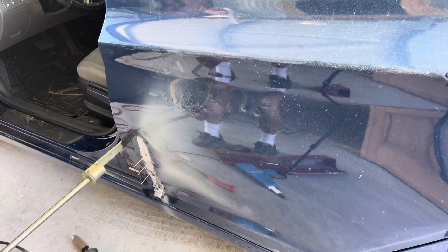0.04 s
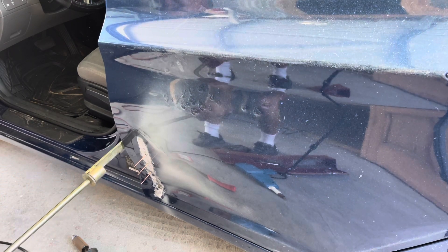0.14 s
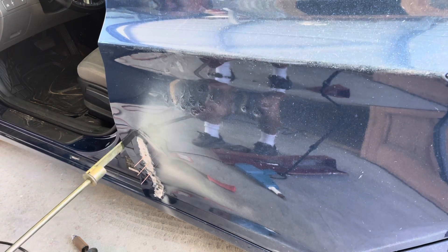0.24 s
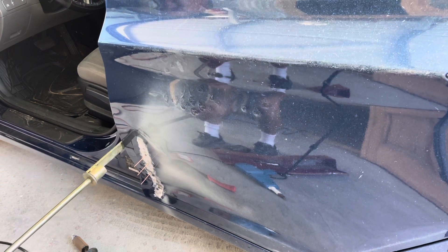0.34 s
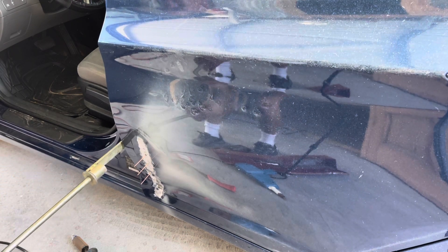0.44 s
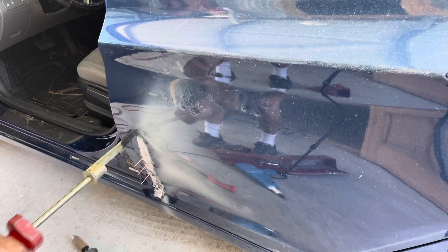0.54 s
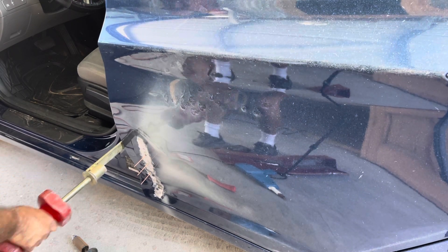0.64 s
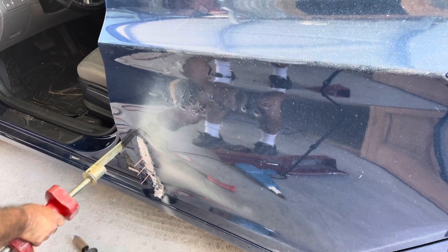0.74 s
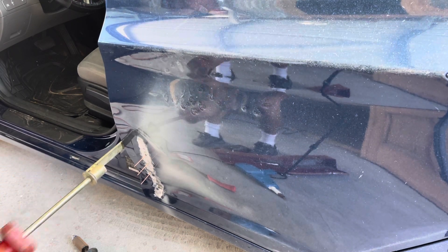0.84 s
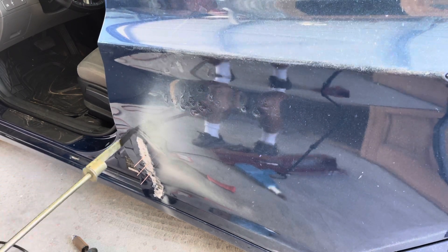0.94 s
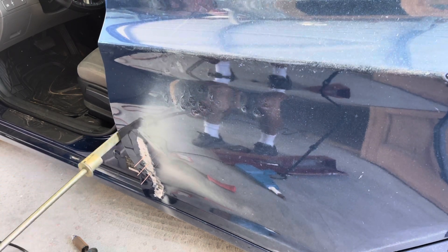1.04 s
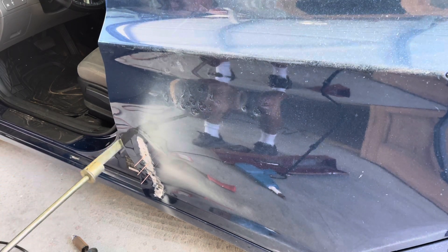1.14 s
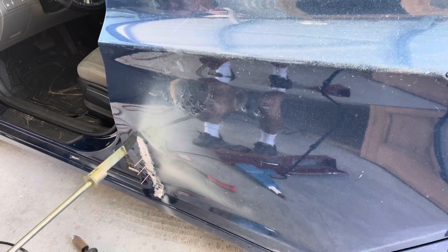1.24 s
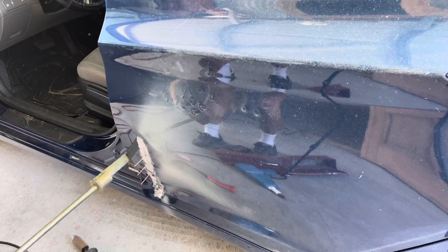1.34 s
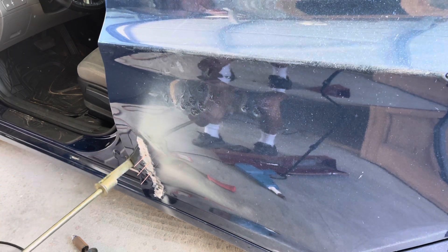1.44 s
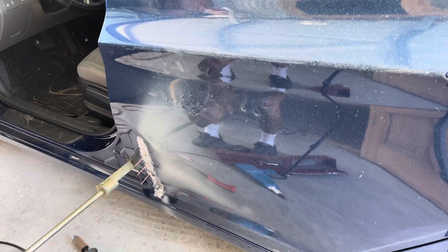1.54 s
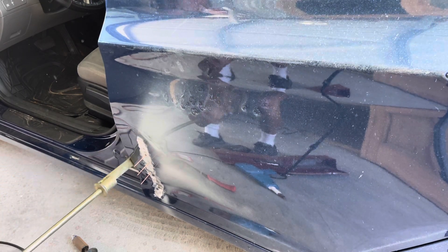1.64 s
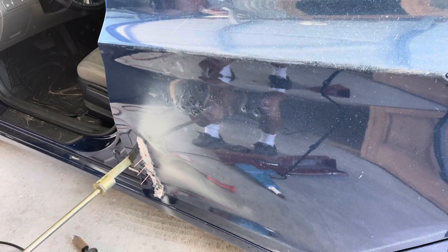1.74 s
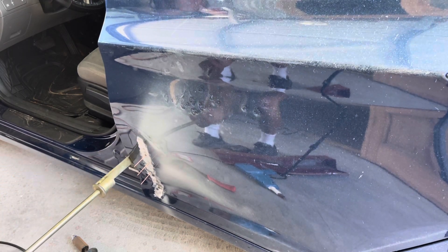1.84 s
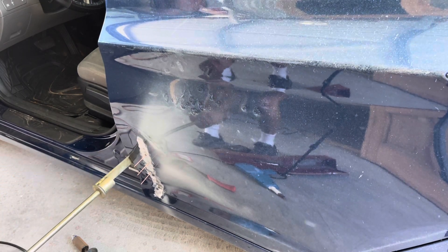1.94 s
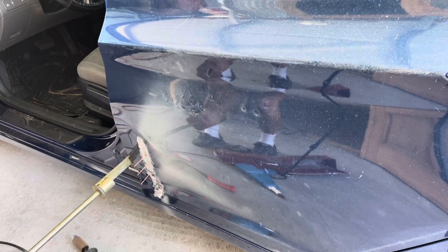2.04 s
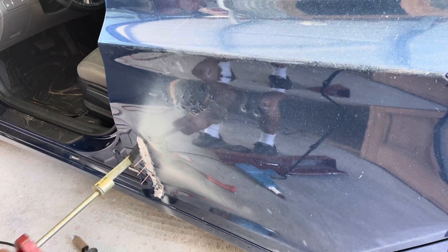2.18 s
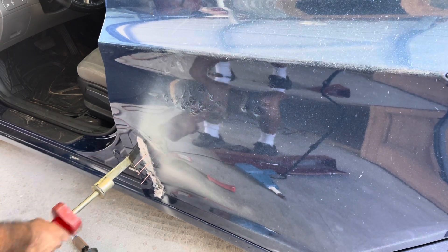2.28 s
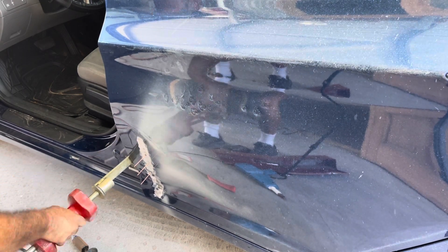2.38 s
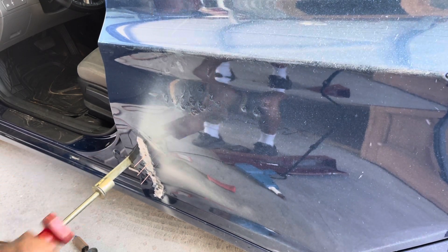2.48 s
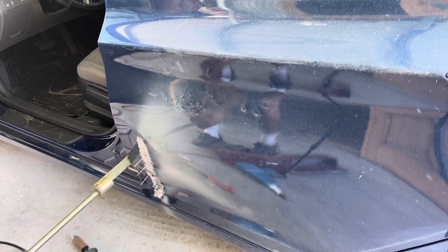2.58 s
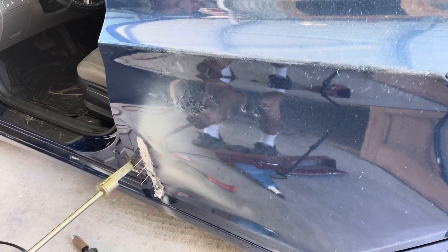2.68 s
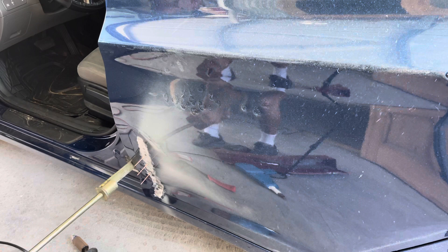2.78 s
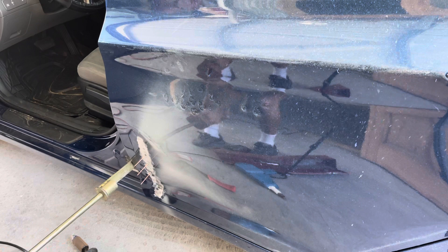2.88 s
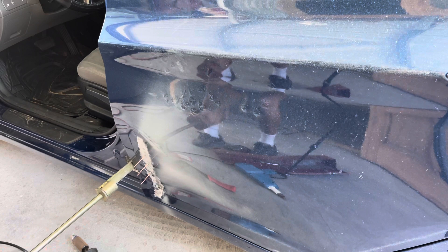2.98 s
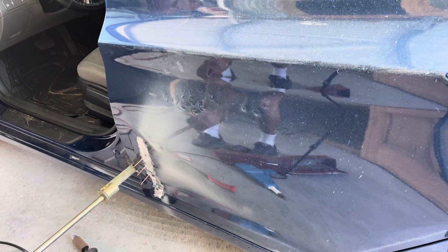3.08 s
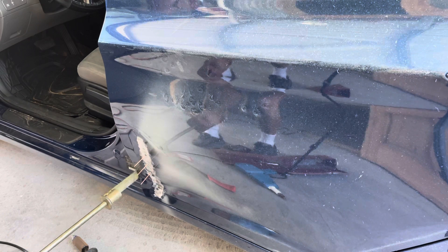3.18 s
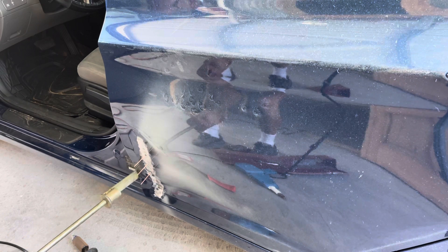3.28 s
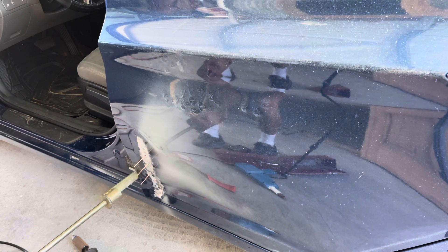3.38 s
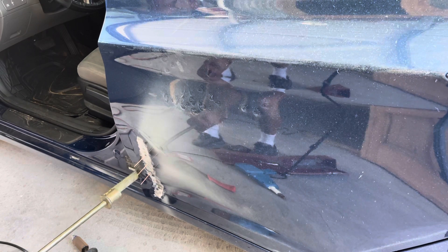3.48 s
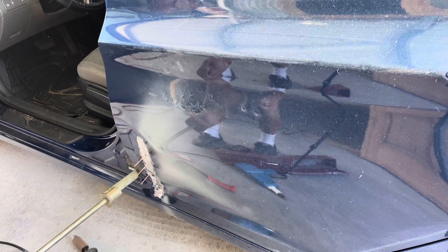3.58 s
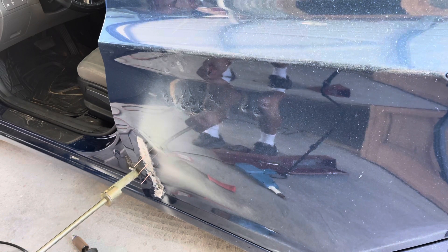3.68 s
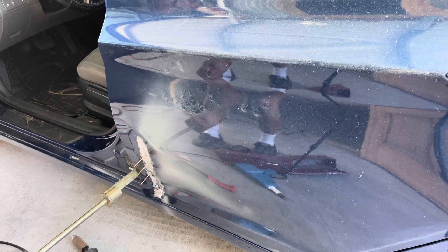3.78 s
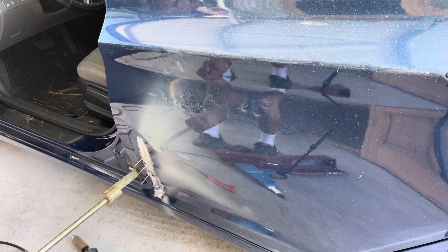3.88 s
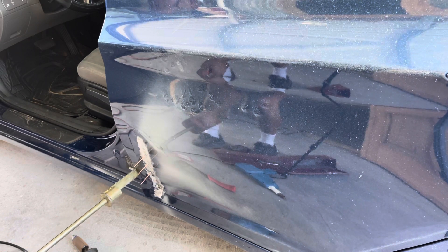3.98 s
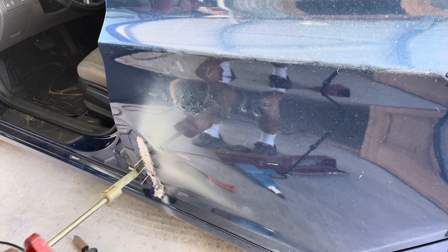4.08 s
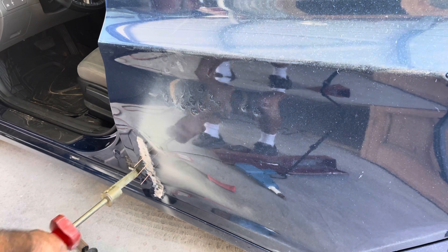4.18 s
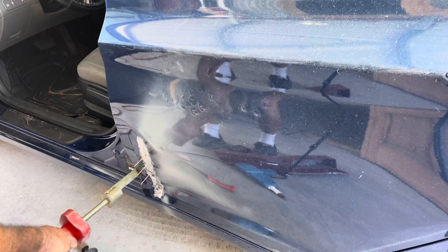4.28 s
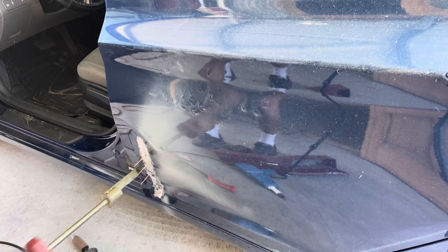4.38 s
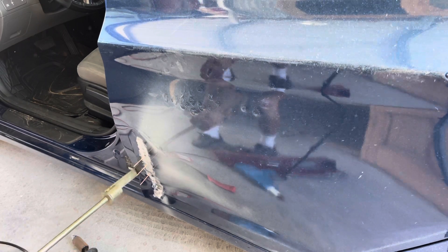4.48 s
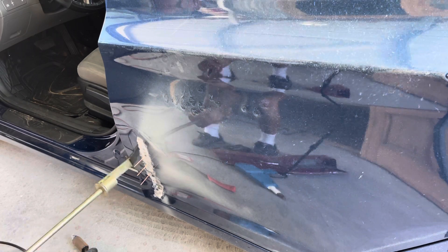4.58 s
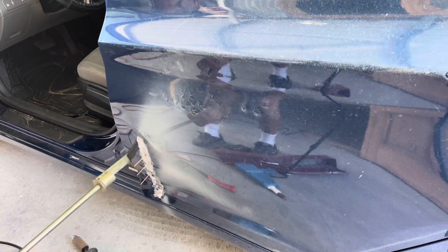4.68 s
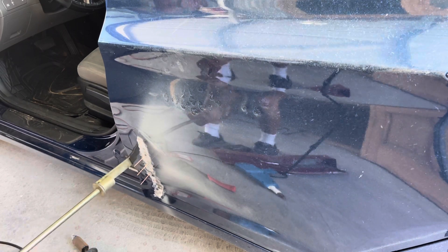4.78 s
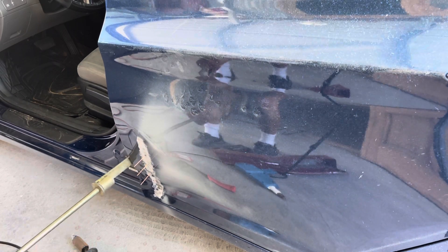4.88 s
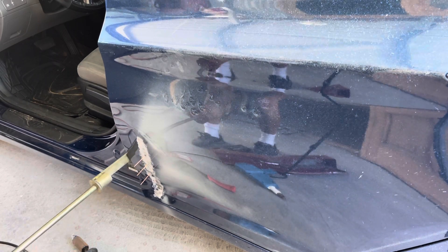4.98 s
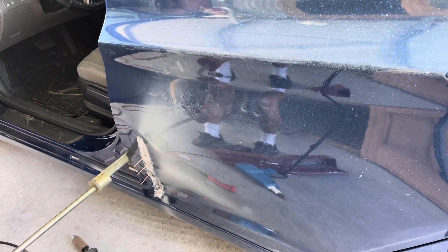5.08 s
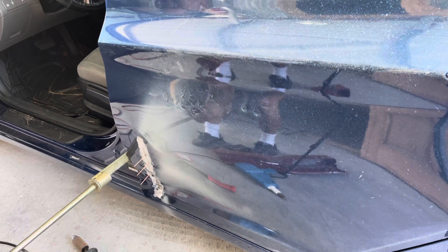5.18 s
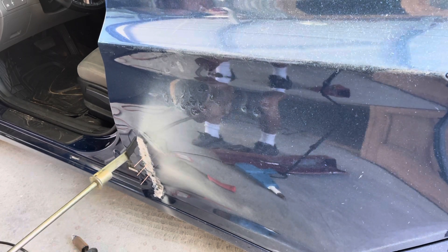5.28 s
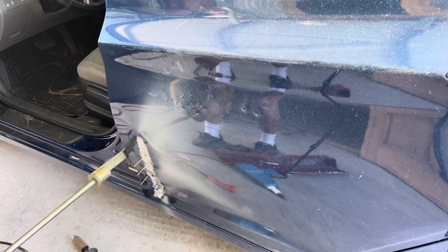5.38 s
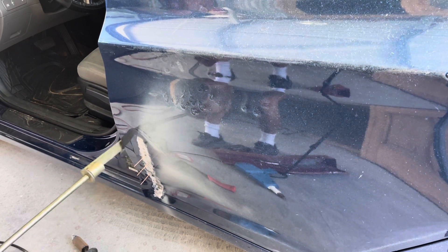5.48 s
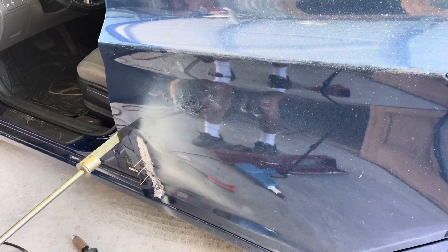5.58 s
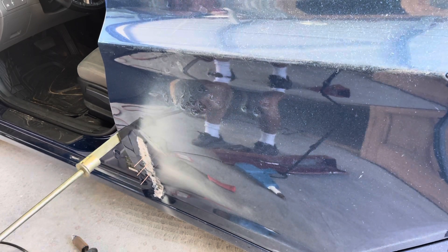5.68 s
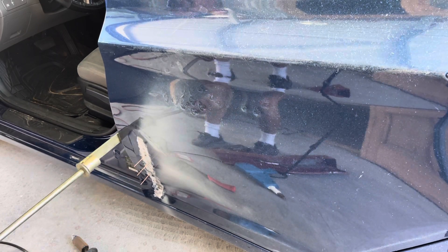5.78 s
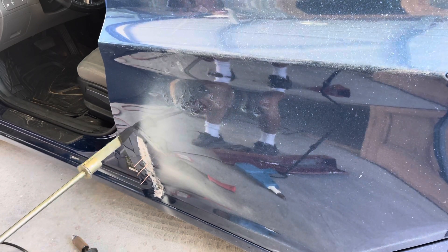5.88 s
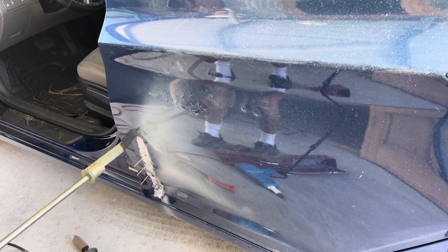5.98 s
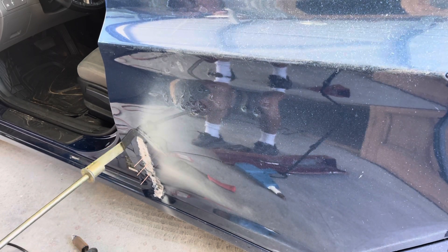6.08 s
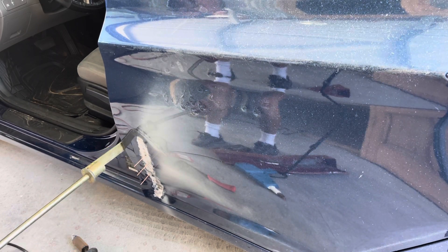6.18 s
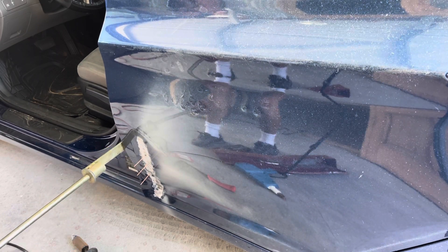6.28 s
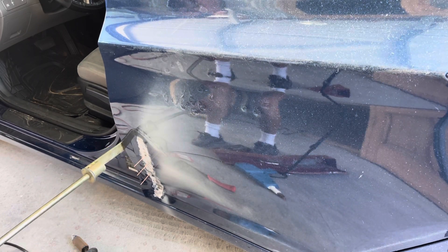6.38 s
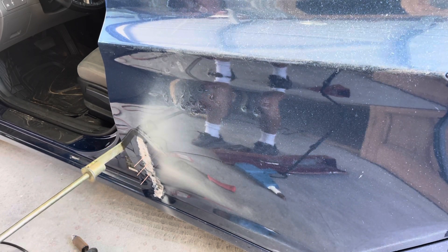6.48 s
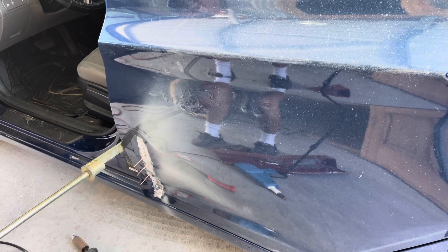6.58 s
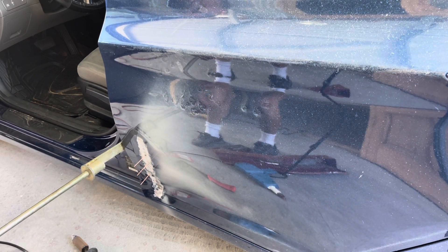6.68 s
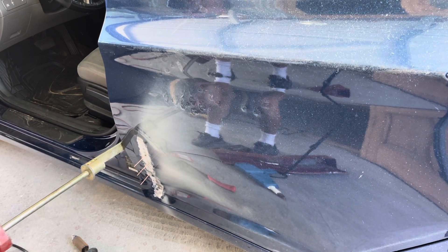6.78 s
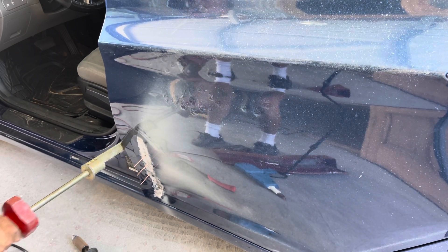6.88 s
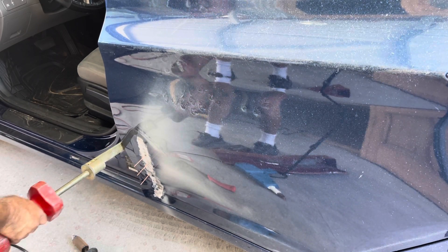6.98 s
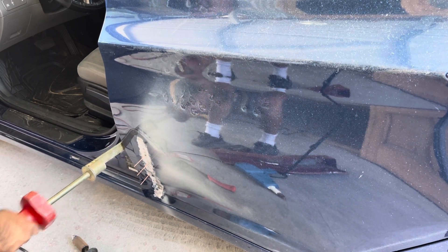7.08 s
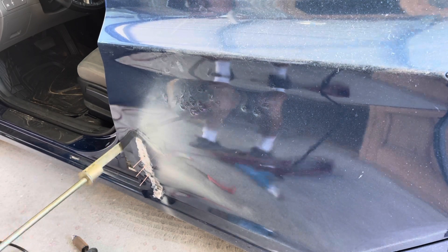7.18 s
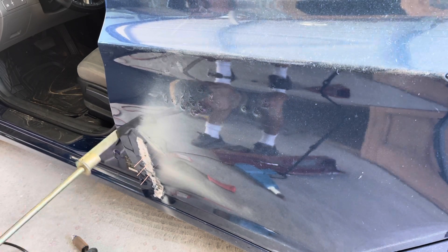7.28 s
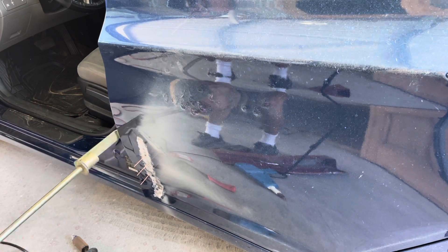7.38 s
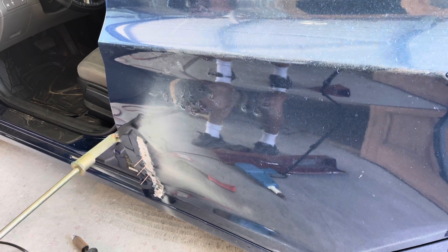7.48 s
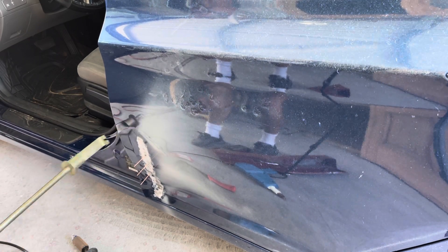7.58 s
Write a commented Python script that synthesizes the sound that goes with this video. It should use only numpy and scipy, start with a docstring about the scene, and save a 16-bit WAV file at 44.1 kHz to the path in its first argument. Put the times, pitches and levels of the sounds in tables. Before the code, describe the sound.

A close stereo view of dent pulling on a car door in a quiet workshop, about 7.6 seconds. At 0.05 a noticeable clunk and tiny knocks, with faint grinding of the hook; from 0.43 a soft rub of the weight along the rod, then a short rising hiss into a huge slam at 0.9: bright steel crack, crashing sheet metal, slow low door boom, loose rattle. Faint scuffs follow around 1.4, a clunk at 1.8, a slide from 2.06 and the second slam at 2.56. A quieter gap holds tiny taps and scraping until another slide at 4.0 and the third, higher-toned slam at 4.43. Several dull and hard knocks cluster from 4.65 to 6.05. After near quiet, a slide at 6.7 leads to the fourth, loudest slam at 7.18, dying into a short room tail and faint scrape over low air noise.

```python
"""A hook grinds and knocks in its hold on a car door, then a weight hisses up a steel rod and slams back on its stop.
Four such blows pull at a dent: shaped noise and ringing modes make the crack of steel, the crash of
sheet metal and the slow boom of the door. Between blows come knocks, soft scuffs and scraping.
Friction noise and drifting resonances follow the speed of the weight along the rod.
A body shop answers with a diffuse tail over low air noise and a faint whine; a fast limiter holds the peaks."""
import sys
import numpy as np
from scipy import signal
from scipy.fft import rfft, irfft, next_fast_len
from scipy.io import wavfile
from scipy.ndimage import uniform_filter1d, minimum_filter1d, map_coordinates

SR = 44100
rng = np.random.default_rng(int(sys.argv[2]) if len(sys.argv) > 2 else 0)


def to_wav(sig):
    """Store sig (one row per channel, or 1-D mono) as 16-bit WAV at the path in sys.argv[1].

    Samples outside -1..1 are clipped; the rate is SR.
    """
    pcm = np.clip(np.atleast_2d(sig), -1, 1) * 32767
    pcm = np.round(pcm).astype(np.int16)
    wavfile.write(sys.argv[1], SR, pcm.T)  # frames by channels


N = 336924  # samples

# The weight meets its stop; the three layer trims are relative to level_db:
# start_s, level_db, steel_db, sheet_db, boom_db, brightness_db_per_octave, panel_hz
BLOWS = [(0.897, -9, 0.5, 0, -0.5, 0.1, 290), (2.5643, -9, 0.5, -1.5, 0, 0.5, 300.5),
         (4.435, -8.5, -1, -1, 0.5, 1.0, 480), (7.18, -8, 2, -1, 1, -0.4, 690)]
# Hook and weight knock against door and rod; tick and rod trims are relative to level_db:
# start_s, level_db, brightness_db_per_octave, tick_db, rod_db
KNOCKS = [(0.05, -23.5, -0.1, -17.5, -32), (0.091, -36.5, -1.5, -3.5, -18.5), (0.111, -30, 1, -10.5, -16),
          (0.698, -37.5, 1.3, -5.5, -11.5), (1.106, -43, -1.5, 3, -17), (1.181, -49.5, -1.5, 2.5, -6),
          (1.254, -44.5, 0.5, -26, -14.5), (1.297, -45, -0.3, -5.5, -8), (1.803, -27.5, 0.5, -8, -10),
          (1.911, -38, 1.6, -9.5, -17), (2.027, -45, 0.3, -32, -36), (2.992, -47, -0.5, 1.5, -4.5),
          (3.605, -50.5, -1.5, -26, -25.5), (3.749, -53, 0.2, -28, -20), (3.799, -51, -0.5, -16, -19),
          (4.306, -49, -2.2, -20.5, -24), (4.657, -29.5, 1.1, -25, -35.5), (4.819, -35, -1.5, -16, -8),
          (4.879, -37.5, -1.5, -34.5, -30), (5.036, -30.5, -1.4, -10, -16), (5.189, -29, 3, -12.5, -26),
          (5.441, -33.5, 0.5, -20, -33), (5.563, -27.5, -0.05, -23, -45), (5.715, -46.5, -3.6, -10.5, -23),
          (5.856, -51, -1.2, -8.5, -12), (5.963, -37, -3.6, -23.5, -33), (6.049, -57, -0.1, -13, -17),
          (7.554, -50.5, 1, 0.5, -8.5)]
# The hook drags softly over the sheet metal: start_s, level_db, rise_s
SCUFFS = [(0.358, -51, .006), (1.384, -44.5, 0.004), (1.432, -43, 0.023), (1.472, -46, 0.01),
          (1.598, -51.5, .006), (1.699, -50.5, .008), (3.059, -48.5, 0.0088), (3.432, -53.5, .005),
          (4.983, -38, .006), (5.405, -43, 0.0043), (5.930, -36, 0.01), (6.754, -45, 0.0027)]
# The weight is pushed up the rod from rest to rest, then pulled back:
# push_start_s, push_end_s, push_top_speed (1 = speed of a blow), pull_length_s
STROKES = [(0.432, 0.782, 0.42, 0.15), (2.06, 2.445, 0.53, 0.16), (3.981, 4.285, 0.36, 0.14),
           (6.71, 7.04, 0.42, 0.12)]
# The hook grinds in its hold: start_s, end_s, starting_level_db, rod_singing_db (relative to the grind)
GRINDS = [(0, .5, -60.5, -23), (1.102, 2.4, -60.5, -32), (2.802, 4.3, -62.5, -32), (4.601, 6.1, -55, -21),
          (6.594, 7.1, -66, -31), (7.398, 7.64, -60, -7)]

# Modes of the door skin, ringing freely: pitch_hz, level_db, t60_s
SKIN_MODES = [(213.7, -8, 0.24), (264.7, -2, 0.15), (281.3, 2, 0.25), (309, 4, 0.16), (343.9, -7.5, 0.067),
              (383.6, -7.5, 0.087), (443, -4, 0.42), (558, -5, .28), (645.5, -2.5, 0.2), (701, 0, 0.26),
              (781, -1, 0.15), (838, -1, 0.09), (934, -3.5, .18), (1012, -3.5, .24), (1070, -8.5, .16),
              (1188, -1.5, .16), (1200, 0, 0.19), (1306, -4.5, .18), (1340, -1, 0.25), (1464, -4.5, 0.087),
              (1630, -8, .16), (1767, -7, .16), (2000, -12.5, 0.12), (2442, -10.5, 0.52)]
# The whole door swings on its hinges: pitch_hz, level_db, t60_s, rise_s
DOOR_MODES = [(48, 9.5, 0.4, .05), (59.7, -2, .55, 0.02), (81, -1.5, 0.45, 0.0058),
              (97.3, -5.5, 0.25, 0.0067), (150.8, 3, .46, 0.0034), (172.4, -3.5, .33, 0.0045)]
# Bending modes of the rod: pitch_hz, level_db, t60_s
ROD_MODES = [(2420, -3.5, 0.19), (2557, -3, 0.21), (4039, -13.5, 0.3), (4930, -4, 0.043), (4970, -8, 0.097),
             (5250, -2.5, 0.17), (6870, -12.5, .12)]
# Resonances of rod and weight while they rub: pitch_hz, width_hz, level_db (relative to rub or hiss)
SLIDE_MODES = [(608, 34, -9.5), (880, 130, -11.5), (1034, 55, -10), (1213, 140, -4.5), (1440, 100, -10),
               (1600, 90, -8.5), (1915, 72, -14), (2380, 71, -13), (2575, 100, -11.5), (3030, 100, -19),
               (3290, 87, -16), (3970, 78, -13), (4370, 110, -7), (5500, 120, -11), (5520, 100, -10),
               (6600, 110, -12), (7500, 150, -19.5), (9400, 180, -15.5)]

# Noise colours, only their shape counts: pitch_hz, density_db (per Hz)
# crack of the steel stop
STEEL_COLOUR = [(700, -30.5), (1500, -8), (2400, 2.5), (3200, -7.5), (4300, 2.5), (5100, 0), (6100, -3),
                (8000, -0.5), (9600, 9), (10700, 4), (11800, -2.5), (13000, -14), (15600, -15.5),
                (17000, -40.5)]
# crash of the sheet metal
SHEET_COLOUR = [(60, -28.5), (110, -8), (195, -8), (290, -3), (500, -9.5), (750, -7.5), (1000, -11.5),
                (1300, -7), (1650, -12.5), (3200, -17.5), (5000, -15), (7500, -19.5), (10000, -16.5),
                (12000, -23), (13500, -46), (16000, -70)]
# loose parts after a blow
RATTLE_COLOUR = [(100, -9.5), (300, -0.5), (1200, 1.5), (1800, -11), (2500, -5), (3500, -14.5),
                 (5200, -11.5), (9000, -20), (12500, -31.5), (15000, -70)]
# body of a knock or scuff
CLUNK_COLOUR = [(200, -10), (400, -2), (750, 1.5), (1300, 0.5), (1900, -8.5), (2500, -5), (3500, -13),
                (6000, -27), (12000, -41.5), (15000, -76.5)]
# hollow of the door
THUD_COLOUR = [(40, -15.5), (90, -4), (150, 6), (210, -9), (300, -4.5), (500, -3), (900, -21.5),
               (3000, -61)]
# steel tick of a knock
TICK_COLOUR = [(1000, -23.5), (2400, -2.5), (3400, -3), (5100, 3), (7000, -6.5), (9800, -2.5), (11800, -11),
               (13000, -41.5), (16000, -58.5)]
# dull rub of the weight on the rod
RUB_COLOUR = [(130, -4.5), (400, -4), (800, -2.5), (1400, -3), (1850, -6.5), (2500, -4.5), (3600, -17),
              (6000, -29.5), (9000, -59.5)]
# bright hiss of the same friction
HISS_COLOUR = [(2000, -21.5), (4300, 4), (5500, -1.5), (8000, -7), (9900, -2), (11500, -10.5),
               (13000, -37.5), (15000, -60)]
# hook against sheet metal
SCRAPE_COLOUR = [(80, -7), (150, 2.5), (210, -5.5), (300, 0.5), (700, 2), (1300, -4), (2500, -15),
                 (5000, -22), (9000, -27.5), (11500, -25), (13500, -65.5)]
# steady background of the shop
AIR_COLOUR = [(20, -32), (42, -9.5), (62, 0.5), (90, -16), (146, -8), (198, -24), (260, -18), (380, -30),
              (800, -35), (1500, -38.5), (3000, -52), (6000, -59), (16000, -71.5)]
# reverberant tail of the shop
SHOP_COLOUR = [(100, 2.5), (1000, -4.5), (5000, -0.5), (12000, -4.0), (14000, -21)]

# Decay of the sheet metal crash: pitch_hz, t60_s
SHEET_DECAY = [(100, 0.22), (300, 0.19), (1000, .18), (3000, .16), (6000, 0.19), (12000, 0.19)]
# Decay of the shop: pitch_hz, t60_s
SHOP_DECAY = [(100, 0.92), (500, .55), (2000, 0.47), (5000, 0.44), (9000, 0.37), (14000, 0.57)]
# Left-right likeness of close sounds, clipped to -1..1 in use: pitch_hz, coherence
NEAR = [(60, 0.78), (300, .9), (650, .25), (1400, 0.054), (3000, 0.095), (5000, -0.44), (8500, -0.2),
        (10200, -1.1), (11500, -0.03), (14000, 1)]
# The same for friction and room: pitch_hz, coherence
DIFFUSE = [(60, 0.94), (200, 1), (400, -0.24), (800, -0.41), (3000, 0.14), (8500, -.2), (10200, -1.1),
           (11500, -0.51)]
# Stereo lean: pitch_hz, left_minus_right_db
LEAN = [(50, 1), (120, 4), (350, 1.5), (700, 6), (1300, 3.5), (2500, -0.5), (4800, 6.5), (8000, 6.5),
        (11000, -1)]

SHEET_LAG_S = .002  # the hook takes up its play before the panel is jerked
PANEL_DB, PANEL_OCTAVES = 4, .3  # the strained panel favours one range, which moves as the dent comes out
BLOW_THUD_DB = -21  # the hollow of the door answers each blow
TYPICAL_KNOCK_DB = -35
KNOCK_RISE_S, RISE_DOUBLING_DB = 0.0025, 19  # rise of a typical knock; doubles with every 19 dB of level
THUD_DB, THUD_DB_PER_BRIGHTNESS = -10, -3.5  # dull contacts push the door harder
KNOCK_BOOM_DB, BOOM_GROWTH = -54, 0.72  # door swing at a typical knock; dB per dB of knock
CLACK_HZ, CLACK_DB_PER_BRIGHTNESS, CLACK_OCTAVES = 1500, 1.5, 0.28  # hard contacts make the door edge clack
SLACK_FROM_S, SLACK_DB = 2.8, -7.5  # from here on the hook hangs slack and its knocks move the door less
HAND_T60_S = .3  # the grip shortens the ring of the rod after a knock
CONTACT_T60_S = .28  # the resting hook damps the door skin after a light contact
SCUFF_T60_S, SCUFF_SLOPE_DB, SCUFF_THUD_DB = 0.18, -3.04, -12.5  # drag decay, dB per octave, thud re scuff
PULL_POWER = .8  # speed grows as this power of time up to the blow
HAND_UNEVEN_DB = 1.4  # the hand does not move quite smoothly
RUB_DB, RUB_DB_PER_DECADE = -43.5, 24.5  # reference at the speed of a blow; dB per tenfold speed
HISS_DB, HISS_DB_PER_DECADE = -57, 28  # the same for the hiss
FRICTION_NOISE_DB = -3.0  # rub and hiss noise re those references
PULL_HISS_DB = 15.5  # extra hiss as the pull presses the bore against the rod
SETTLE_DB_PER_S = 7  # the grind eases off as the hook settles
GRIND_TRIM_DB = -4.5  # applied to every grind
SING_HZ, SING_WIDTH_HZ = 5000, 600  # the grinding hook makes the rod sing faintly
TOP_HZ = 16200  # band limit


def blows():
    """The stop cracks and chatters for milliseconds; the rod jerks the sheet metal and loose parts rattle."""
    out, t = np.zeros((2, N)), clock(SR)
    for s, db, steel_db, sheet_db, boom_db, slope_db, panel_hz in BLOWS:
        chatter = swell(t, rise=.001) * fade(np.maximum(t - .004, 0), t60=0.047)  # held 4 ms, then dies
        crack = amp(-1.5) * chatter * noise(STEEL_COLOUR, NEAR, size=SR)
        rod = amp(-25.5) * ring(ROD_MODES, t, scatter_db=3, detune=.005)
        add(out, s, amp(db + steel_db) * (crack + rod))

        crash = amp(-3.5) * swell(t, rise=0.0011) * dying(noise(SHEET_COLOUR, NEAR, size=SR), SHEET_DECAY)
        skin = amp(-18.5) * swell(t, rise=0.00099) * ring(SKIN_MODES, t, scatter_db=2.0, detune=.006)
        shaking = amp(3.4 * wobble(rate=34, size=SR))
        rattle = amp(-27.5) * fade(t, t60=.65) * noise(RATTLE_COLOUR, NEAR, size=SR, grain=shaking)
        sheet = tilted(crash + skin + rattle, slope_db)
        sheet = humped(sheet, panel_hz, PANEL_DB, PANEL_OCTAVES)
        add(out, s + SHEET_LAG_S, amp(db + sheet_db) * sheet)

        low_end = amp(-17.5) * door_boom(t) + amp(BLOW_THUD_DB) * door_thud(t)
        add(out, s, amp(db + boom_db) * low_end)
    return out


def door_boom(t):
    """The heavy door takes up the jerk slowly and swings out as low decaying modes."""
    out = np.zeros(len(t))
    for (hz, db, t60, rise), (detune, phase) in zip(DOOR_MODES, rng.standard_normal((len(DOOR_MODES), 2))):
        swing = np.sin(2 * np.pi * (hz * (1 + 0.016 * detune) * t + phase))
        out += amp(db) * swell(t, rise) ** 2 * fade(t, t60) * swing
    return out


def door_thud(t):
    """A soft push into the hollow of the door."""
    return swell(t, rise=0.0044) * fade(t, t60=0.25) * noise(THUD_COLOUR, NEAR, size=len(t))


def sliding():
    """A push speeds up and slows down, then a pull gains speed until the weight meets its stop."""
    out = np.zeros((2, N))
    for (start, end, top_speed, pull_s), (blow, *_) in zip(STROKES, BLOWS):
        t = start + clock(size=SR * 3 // 5)
        push = top_speed * np.sin(np.pi * np.clip((t - start) / (end - start), 0, 1))
        pull = np.clip(1 + (t - blow) / pull_s, 0, 1) * (t < blow)
        unevenness = amp(HAND_UNEVEN_DB * wobble(rate=18, size=len(t)))
        speed = (push + pull ** PULL_POWER) * unevenness
        add(out, start, friction(speed, PULL_HISS_DB * pull))
    return out


def friction(speed, press_db):
    """The bore rubs along the rod: a dull rub, a hiss that grows faster with speed, and singing steel."""
    size, decades = len(speed), np.log10(np.maximum(speed, 1e-3))
    rub_db = RUB_DB + RUB_DB_PER_DECADE * decades
    hiss_db = HISS_DB + HISS_DB_PER_DECADE * decades
    bumps = amp(1.1 * wobble(rate=730, size=size))
    sound = amp(rub_db + FRICTION_NOISE_DB) * noise(RUB_COLOUR, DIFFUSE, size=size, grain=bumps)
    hiss = noise(HISS_COLOUR, DIFFUSE, size=size, grain=bumps)
    sound += amp(hiss_db + press_db + FRICTION_NOISE_DB) * hiss
    for hz, width_hz, db in SLIDE_MODES:
        high = np.interp(hz, [2800, 4300], [0, 1])  # low modes follow the rub, high ones the hiss
        level_db = db + (1 - high) * rub_db + high * hiss_db
        sound += amp(level_db) * rubbed_mode(hz, width_hz, size=size)
    return sound


def rubbed_mode(hz, width_hz, size):
    """A resonance fed by friction: narrow noise around a pitch that drifts, as does its strength."""
    phase = 2 * np.pi * np.cumsum(hz * (1 + 0.02 * wobble(rate=9, size=size))) / SR
    drive = filtered(rng.standard_normal((2, 2, size)), lambda f: 1 / (1 + (2 * f / width_hz) ** 2))
    tone = unit(drive[0] * np.cos(phase) + drive[1] * np.sin(phase))
    return amp(3.3 * wobble(rate=10, size=size)) * tone


def knocks():
    """Loose contacts: a tick of steel, a ring of the rod, a clunk and a thud in the door."""
    out, t = np.zeros((2, N)), clock(SR // 2)
    for s, db, slope_db, tick_db, rod_db in KNOCKS:
        force_db = db - TYPICAL_KNOCK_DB
        rise = KNOCK_RISE_S * 2 ** (force_db / RISE_DOUBLING_DB)
        grip = amp(SLACK_DB * (s > SLACK_FROM_S))
        clunk = amp(-7.0) * fade(t, t60=0.15) * noise(CLUNK_COLOUR, NEAR, size=len(t))
        skin = amp(-19) * fade(t, CONTACT_T60_S) * ring(SKIN_MODES, t, scatter_db=4.0, detune=.025)
        panel = tilted(clunk + skin, slope_db)
        panel = humped(panel, CLACK_HZ, CLACK_DB_PER_BRIGHTNESS * slope_db, CLACK_OCTAVES)
        thud = grip * amp(THUD_DB + THUD_DB_PER_BRIGHTNESS * slope_db) * door_thud(t)
        boom = grip * amp(KNOCK_BOOM_DB + BOOM_GROWTH * force_db) * door_boom(t)
        tick = amp(tick_db - 2.0) * fade(t, t60=0.11) * noise(TICK_COLOUR, NEAR, size=len(t))
        buzz = amp(3 * wobble(rate=250, size=len(t)))  # the rod buzzes in the loose weight
        rod_ring = ring(ROD_MODES, t, scatter_db=3.0, detune=.008)
        rod = amp(rod_db + 1.5) * buzz * fade(t, HAND_T60_S) * rod_ring
        add(out, s, swell(t, rise) * (amp(db) * (panel + thud + tick + rod) + boom))
    return out


def scuffs():
    """Slow, dull contacts stir the door skin and leave the steel silent."""
    out, t = np.zeros((2, N)), clock(SR // 2)
    for s, db, rise in SCUFFS:
        drag = amp(-8.0) * fade(t, SCUFF_T60_S) * noise(CLUNK_COLOUR, NEAR, size=len(t))
        skin = amp(-18) * fade(t, CONTACT_T60_S) * ring(SKIN_MODES, t, scatter_db=5.0, detune=.025)
        thud = amp(SCUFF_THUD_DB) * door_thud(t)
        add(out, s, amp(db) * swell(t, rise) * (tilted(drag + skin, SCUFF_SLOPE_DB) + thud))
    return out


def grinding():
    """The hook shifts unevenly against the sheet metal and eases off as it settles."""
    out, t = np.zeros((2, N)), clock(N)
    slips = amp(3.9 * wobble(rate=22, size=N) + 2.5 * wobble(rate=150, size=N))
    scrape = noise(SCRAPE_COLOUR, NEAR, size=N, grain=slips)
    singing = rubbed_mode(SING_HZ, SING_WIDTH_HZ, size=N)
    for start, end, db, sing_db in GRINDS:
        pressure = amp(db - SETTLE_DB_PER_S * (t - start)) * (t >= start) * (t < end)
        pressure = uniform_filter1d(pressure, size=2000)  # soft edges
        out += amp(GRIND_TRIM_DB) * pressure * (scrape + amp(sing_db) * singing)
    return out


def shop(x):
    """The diffuse answer of the workshop: the left channel convolved with a stereo noise tail."""
    tail = dying(noise(SHOP_COLOUR, DIFFUSE, size=SR), SHOP_DECAY)
    tail = tail * swell(clock(SR), rise=0.049)
    return signal.fftconvolve(x[:1], tail / np.linalg.norm(tail[0]), axes=1)[:, :N]


def shop_background():
    """Steady air noise and a faint whine whose phase wavers."""
    air = amp(-59.5) * noise(AIR_COLOUR, DIFFUSE, size=N)
    whine = amp(-90) * np.sin(2 * np.pi * 1945 * clock(N) + .6 * wobble(rate=11, size=N))
    return air + whine


def amp(db):
    """Decibels to amplitude factor."""
    return 10 ** (np.asarray(db) / 20)


def unit(x):
    """x scaled to an rms of 1."""
    return x / np.sqrt(np.mean(x ** 2) + 1e-20)


def along(points, hz):
    """(Hz, value) points read off on a log frequency axis."""
    f, v = np.transpose(points)
    return np.interp(np.log(hz + 1), np.log(f + 1), v)


def clock(size):
    """Time in seconds from 0."""
    return np.arange(size) / SR


def add(track, s, sound):
    """Mix a sound into a track from time s on."""
    part = track[:, round(s * SR):][:, :sound.shape[-1]]
    part += sound[..., :part.shape[1]]


def filtered(x, response):
    """x shaped by a response of frequency."""
    size = x.shape[-1]
    m = next_fast_len(size + SR // 10)
    return irfft(rfft(x, m) * response(np.fft.rfftfreq(m, 1 / SR)), m)[..., :size]


def tilted(x, slope_db):
    """Harder contact is brighter: dB per octave about 900 Hz, flat below 200 Hz and above 4 kHz."""
    return filtered(x, lambda hz: amp(slope_db * np.log2(np.clip(hz, 200, 4000) / 900)))


def humped(x, centre_hz, db, octaves):
    """x with one broad range of frequencies raised, or lowered if db is negative."""
    def hump(hz):
        distance = np.log2((hz + 1) / centre_hz) / octaves
        return amp(db * np.exp(-.5 * distance ** 2))
    return filtered(x, hump)


def wobble(rate, size):
    """A smooth random curve, rate knots a second."""
    knots = rng.standard_normal(int(size * rate / SR) + 4)
    return map_coordinates(knots, [clock(size) * rate], mode="nearest")


def noise(spectrum, alike, size, grain=1):
    """Stereo noise of rms 1 with a given colour and likeness; grain weights it before the colouring."""
    def mid_side_colour(hz):
        turn = np.arccos(np.clip(along(alike, hz), -1, 1)) / 2
        return amp(along(spectrum, hz)) * [np.cos(turn), np.sin(turn)]
    mid, side = filtered(grain * rng.standard_normal((2, size)), mid_side_colour)
    return unit(np.array([mid + side, mid - side]))


def fade(t, t60):
    """Exponential decay by 60 dB in t60 seconds."""
    return np.exp(-np.log(1000) * t / np.maximum(t60, 1e-3))


def swell(t, rise):
    """Exponential approach to 1 with a time constant of rise seconds."""
    return 1 - np.exp(-t / max(rise, 1e-5))


def dying(x, decays):
    """Each frequency of x dies at its own speed."""
    hz, t, z = signal.stft(x, SR, nperseg=128)
    z = z * fade(t, along(decays, hz)[:, None])
    return signal.istft(z, SR, nperseg=128)[1][:, :x.shape[1]]


def ring(modes, t, scatter_db, detune):
    """Modes struck at new strengths and shifted slightly by the load, out of step between the channels."""
    out = np.zeros((2, len(t)))
    for (hz, db, t60), (size, shift, phase, skew) in zip(modes, rng.standard_normal((len(modes), 4))):
        apart = np.sign(skew) * np.arccos(np.clip(along(NEAR, hz), -1, 1)) / 2
        angle = 2 * np.pi * (hz * (1 + detune * shift) * t + phase) + np.array([[apart], [-apart]])
        out += amp(db + scatter_db * size) * fade(t, t60) * np.sin(angle)
    return out


def scene():
    """The work, its echo and the shop's background, leaned left or right by frequency."""
    work = blows() + sliding() + knocks() + scuffs() + grinding()
    heard = work + amp(-24.0) * shop(work) + shop_background()
    # half the lean goes to each channel
    return filtered(heard, lambda hz: amp(along(LEAN, hz) * np.array([[.5], [-.5]])))


def record(dry):
    """A limiter with a window of about 1 ms holds peaks to 0.95, then a steep low-pass trims the top."""
    needed = np.minimum(1, .95 / (np.abs(dry).max(axis=0) + 1e-9))
    gain = uniform_filter1d(minimum_filter1d(needed, size=45), size=45)
    return filtered(dry * gain, lambda hz: 1 / (1 + (hz / TOP_HZ) ** 120))


dry = scene()
out = record(dry)
to_wav(out)
```